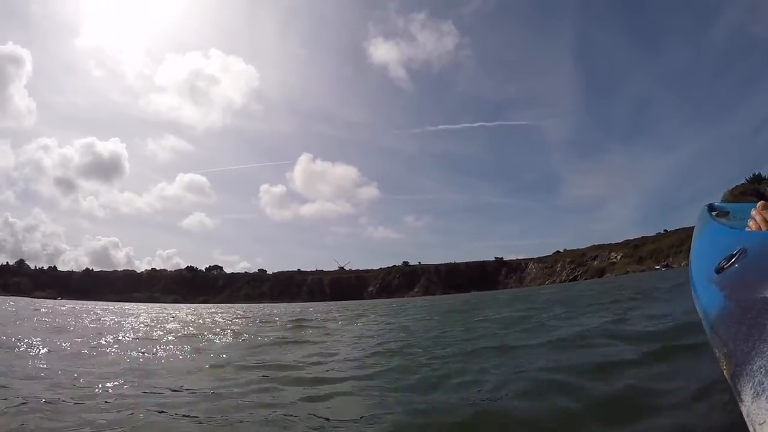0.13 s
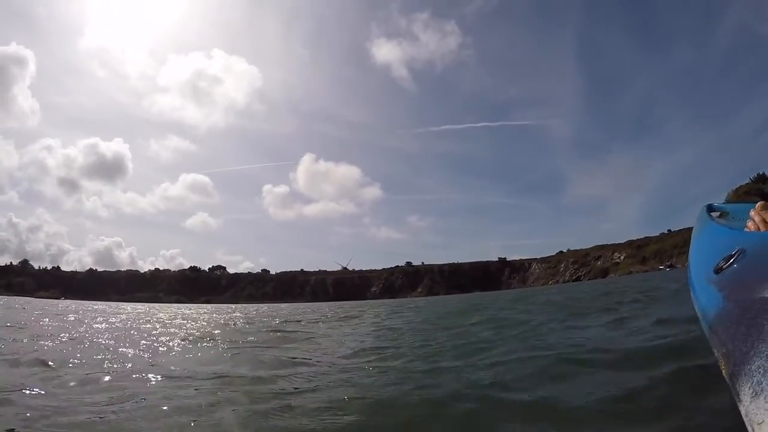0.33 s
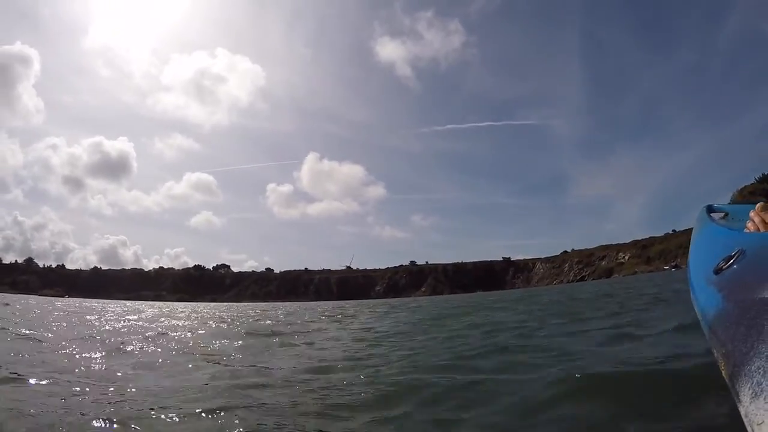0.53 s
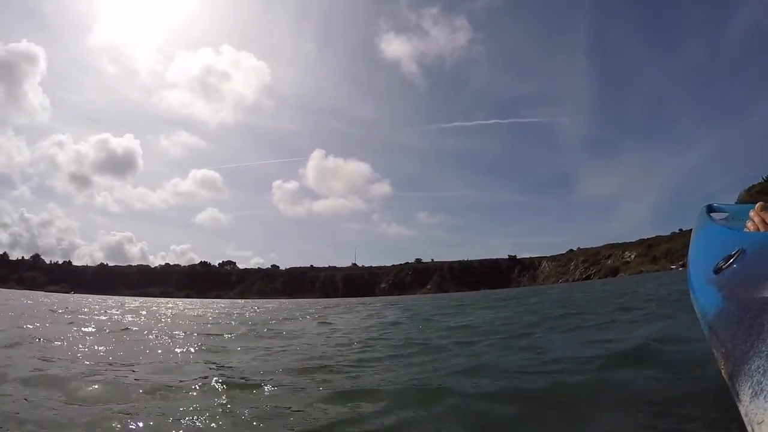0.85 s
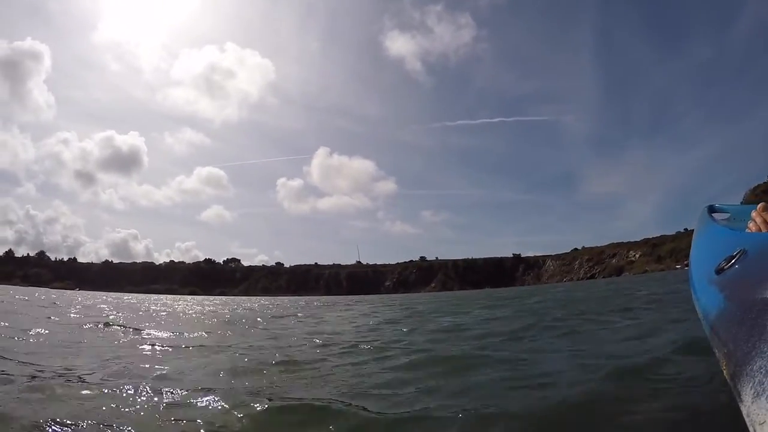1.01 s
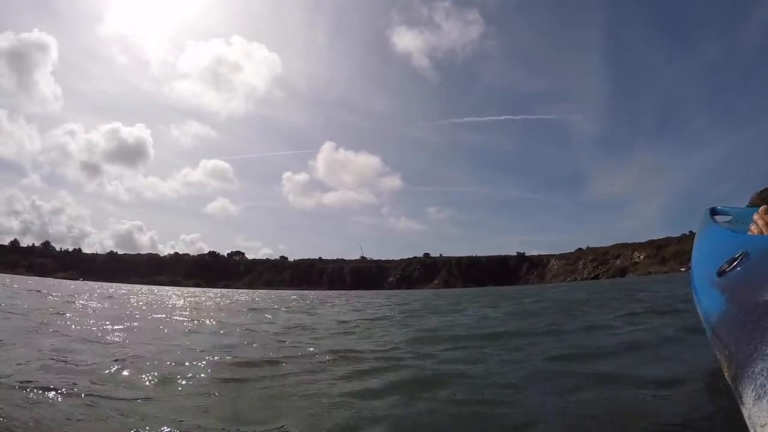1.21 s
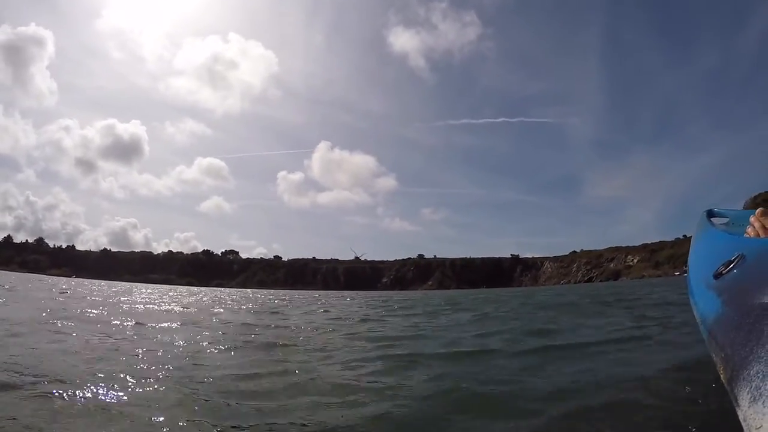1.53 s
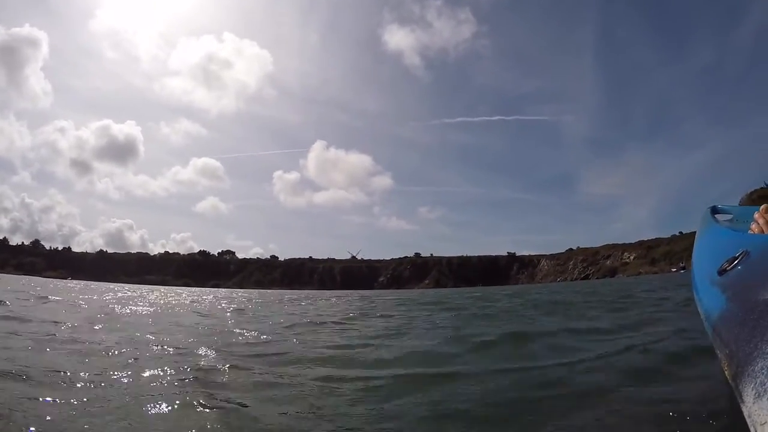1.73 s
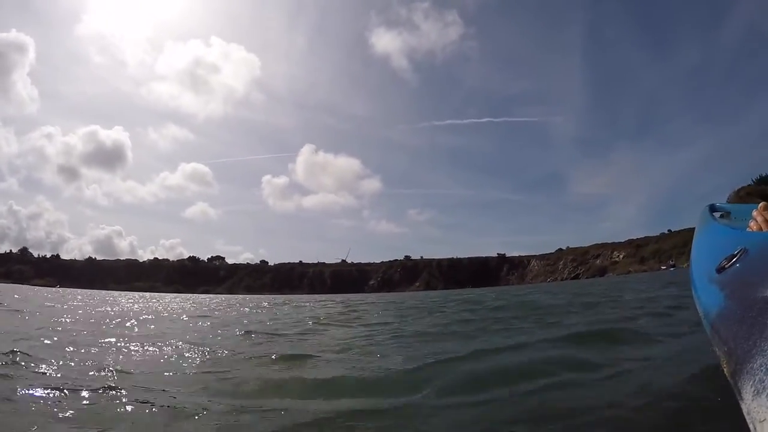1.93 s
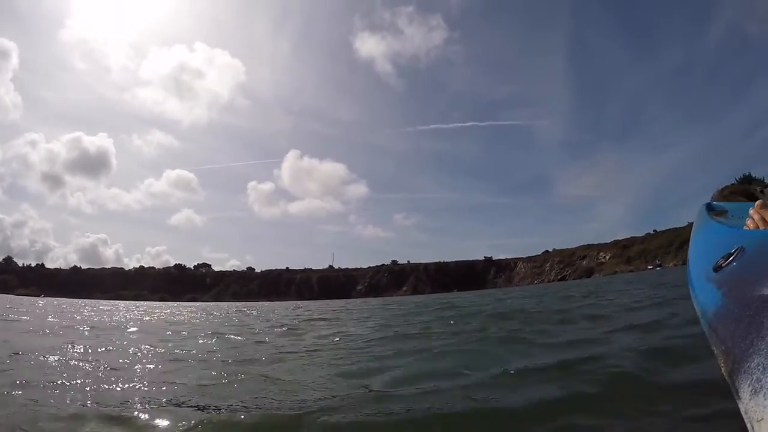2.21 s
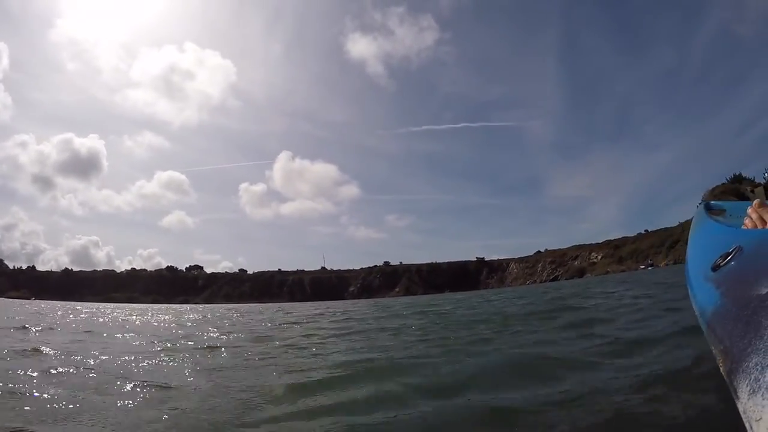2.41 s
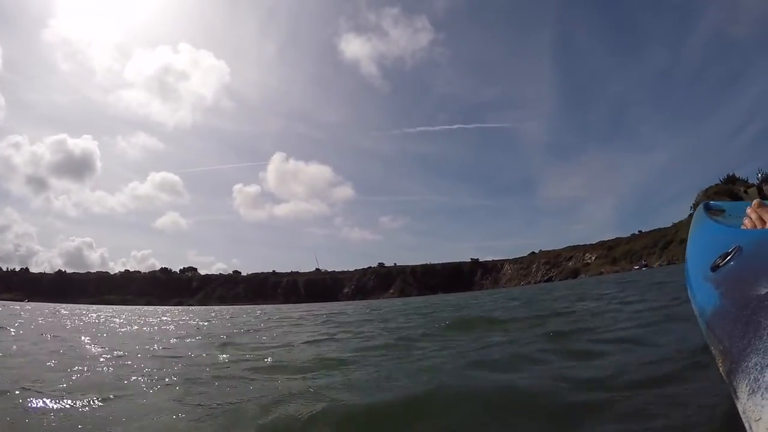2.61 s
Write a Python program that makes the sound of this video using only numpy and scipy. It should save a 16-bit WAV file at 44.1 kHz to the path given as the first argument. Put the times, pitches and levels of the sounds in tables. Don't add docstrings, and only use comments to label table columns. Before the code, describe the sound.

Small waves lap and plop against a plastic kayak hull over low, uneven wind rumble

```python
import sys
import numpy as np
from scipy import signal
from scipy.fft import rfft, irfft
from scipy.io import wavfile
from scipy.ndimage import uniform_filter1d

SR = 44100
rng = np.random.default_rng(int(sys.argv[2]) if len(sys.argv) > 2 else 0)


def level_to_linear(level):
    exponent = np.asarray(level, float) / 20
    return 10 ** exponent


def store_pcm(level_fs):
    pcm = np.round(np.clip(level_fs, -1, 1) * 32767).astype(np.int16)
    wavfile.write(sys.argv[1], SR, np.atleast_2d(pcm).T)


N = 121275
SPACING_S = .0006


def rms_one(x):
    return x / np.sqrt(np.mean(x ** 2) + 1e-20)


def in_time(rows):
    s, *columns = np.transpose(rows)
    return [np.interp(np.arange(N) / SR, s, column) for column in columns]


def at_hz(points, hz):
    point_hz, point_db = np.transpose(points)
    return np.interp(np.log(hz), np.log(point_hz), point_db)


def drift(rate_hz):
    r = np.exp(-2 * np.pi * rate_hz * 40 / SR)
    noise = rng.standard_normal(N // 40 + 2002)
    slow = signal.lfilter([1], [1, -2 * r, r * r], noise)[2000:]
    return np.interp(np.arange(N) / 40, np.arange(len(slow)), rms_one(slow))


def colour(x, spectrum):
    hz = np.maximum(np.fft.rfftfreq(N, 1 / SR), 1)
    gain = level_to_linear(at_hz(spectrum, hz)) * (hz > spectrum[0][0])
    return rms_one(irfft(rfft(x) * gain, N))


def bandpass(x, low_hz, high_hz):
    return signal.sosfilt(signal.butter(2, [low_hz, high_hz], "band", fs=SR, output="sos"), x)


def panned(pan_db):
    return level_to_linear(np.array([[.5], [-.5]]) * pan_db)


def add(out, s, sound, pan_db, side):
    for channel, gain in enumerate(panned(pan_db)[:, 0]):
        late_s = SPACING_S * max(side * (1 - 2 * channel), 0)
        i = int((s + late_s) * SR)
        out[channel, i:i + len(sound)] += gain * sound[:N - i]


def blip(hz, rise, length_s, attack):
    u = np.arange(int(2 * length_s * SR)) / (length_s * SR)
    waver = 1 + .55 * np.sin(2 * np.pi * (rng.uniform(1, 2) * u + rng.random()))
    swell = np.minimum(u / attack, 1) * level_to_linear(-16 * np.maximum(u - attack, 0) ** 2)
    start_hz, end_hz = hz * (1 - rise / 2), hz * (1 + rise / 2)
    pitch_hz = start_hz * (end_hz / start_hz) ** u * (0.983 + 0.018 * waver)
    return np.sin(2 * np.pi * np.cumsum(pitch_hz) / SR) * swell * waver


def grains(rate, spread):
    sizes = level_to_linear(spread * np.minimum(rng.exponential(1, N), 2.6)) * rng.choice([-1, 1], N)
    sizes = sizes * (rng.random(N) < rate / SR)
    at = np.flatnonzero(sizes)
    place = rng.uniform(-1, 1, N)[at]
    out = np.zeros((2, N))
    out[0, at] = sizes[at] * level_to_linear(4 * place)
    at_right = np.clip(at + (place * SPACING_S * SR).astype(int), 0, N - 1)
    np.add.at(out[1], at_right, sizes[at] * level_to_linear(-4 * place))
    return out


def ringing(rate, cycles, low_hz, high_hz, count):
    out = 0
    for hz in np.geomspace(low_hz, high_hz, count):
        r = level_to_linear(-60 * hz / (cycles * np.sqrt(hz / 1000) * SR))
        w = 2 * np.pi * hz / SR
        clicks = grains(rate * hz / 60000, spread=4.0) + 1e-18
        rings = signal.lfilter([0, 1], [1, -2 * r * np.cos(w), r * r], clicks)
        out = out + rms_one(rings) * np.sqrt(hz)
    return out


# time_s, level_db, left_minus_right_db, flutter_db
WIND_GUSTS = [(0, -36.5, 0.5, 0), (0.22, -38.5, 2, 1), (0.36, -33.5, 8, -3), (0.5, -36.5, 18.5, -2.5),
              (0.62, -31.5, -7.5, 2), (0.76, -38, -1, 5), (0.9, -32.5, -9.5, 0.5), (1.2, -34, -1, -1),
              (1.38, -33.5, -5, 1.5), (1.55, -38.5, -18.5, 2.5), (1.75, -48.5, -21, 3),
              (2.05, -34.5, -5.5, 2), (2.22, -33.5, -16, -4), (2.32, -41.5, -5, 1), (2.42, -35, -19, -15),
              (2.6, -43.5, -9.5, 5), (2.74, -40.5, -8, -3.5)]
# freq_hz, density_db (per Hz)
WIND_COLOUR = [(12, -41), (20, 2.5), (45, -1), (90, -15), (151, -28), (500, -49.5), (650, -66),
               (1100, -120)]
FLUTTER_HZ = 69.4


def wind():
    level_db, pan_db, flutter_db = in_time(WIND_GUSTS)
    rumble = colour(rng.standard_normal((2, N)), WIND_COLOUR)
    power = uniform_filter1d(rumble ** 2, SR // 12, axis=1)
    rumble = rms_one(rumble / (power + 0.24) ** 0.028)
    hz = np.fft.rfftfreq(N, 1 / SR)
    thud = irfft(rfft(rumble) / (1 + (hz / FLUTTER_HZ) ** 6), N)
    rumble = thud + (rumble - thud) * level_to_linear(flutter_db)
    return rumble * level_to_linear(level_db + 1.0) * panned(0.87 * pan_db)


# time_s, level_db
WASH_LEVEL = [(0.0, -58), (1.99, -64), (2.75, -60.5)]
# freq_hz, density_db (per Hz)
WASH_COLOUR = [(120, 1.5), (200, 0.5), (601, -9.5), (1300, -9), (2090, -14), (8740, -23), (16000, -31)]
FIZZ_PER_S, FIZZ_CYCLES, FIZZ_DB = 2500, 6.1, -4
GURGLE_PER_S, GURGLE_CYCLES, GURGLE_DB = 1200, 22, -2


def wash():
    level_db, = in_time(WASH_LEVEL)
    hiss, together = 0, drift(12)
    white = rng.standard_normal((2, 2, N))
    edges = 200 * 2 ** np.arange(0, 6.6, .5)
    for k, (low_hz, high_hz) in enumerate(zip(edges, edges[1:])):
        band = bandpass(white[k % 2], low_hz, high_hz)
        hiss = hiss + band * level_to_linear(1.2 * together + 1.5 * drift(15))
    fizz = ringing(FIZZ_PER_S * level_to_linear(2.2 * together), FIZZ_CYCLES, 300, 14000, count=20)
    gurgle = ringing(GURGLE_PER_S * level_to_linear(4 * drift(5)), GURGLE_CYCLES, 400, 2200, count=14)
    fade_in = np.minimum(np.arange(N) / (0.047 * SR), 1)
    water = colour(hiss, WASH_COLOUR) + level_to_linear(FIZZ_DB) * colour(fizz, WASH_COLOUR)
    water = water + level_to_linear(GURGLE_DB) * colour(gurgle, WASH_COLOUR) * fade_in
    return water * level_to_linear(level_db - 0.5)


ABEAM_PLOPS = [0.0, 0.144, 0.434, 0.448, 0.495, 0.575, 0.599, 0.78, 0.937, 1.482, 1.59, 2.554]
NEAR_SIDE = .3


def bearing(s, hz):
    near = NEAR_SIDE * rng.uniform(-1, 1) * min(1000 / hz, 1)
    abeam = min(.42 / (hz * SPACING_S), 1)
    return abeam if s in ABEAM_PLOPS else near


# start_s, pitch_hz, peak_db, length_s, left_minus_right_db
AIR_POCKETS = [(0.0, 740, -45, 0.036, 8), (0.144, 690, -45, 0.012, 1), (0.19, 385, -50, .02, -2),
               (0.208, 1050, -51, .012, 0), (0.265, 1100, -52, .006, -2), (0.368, 1130, -46, 0.008, -1),
               (0.486, 1100, -45, .008, -3), (0.495, 680, -41, 0.012, -4), (0.548, 1290, -50, .01, -3),
               (0.55, 430, -52, .012, -3), (0.574, 830, -48, 0.024, -2), (0.641, 890, -51, .008, 0),
               (0.78, 590, -49, .01, -2), (0.781, 1110, -49, 0.008, -1), (0.805, 900, -51, 0.018, -3),
               (0.937, 860, -48, 0.02, -5), (0.966, 860, -43, 0.012, 3), (1.071, 530, -52, 0.02, -5),
               (1.146, 830, -50, 0.024, -2), (1.286, 1200, -47, 0.008, -9), (1.299, 400, -48, .016, -5),
               (1.388, 950, -47, 0.008, -1), (1.482, 760, -48, .008, 0), (1.544, 860, -47, 0.01, -2),
               (1.59, 740, -46, 0.02, 4), (1.743, 1170, -52, 0.009, -3), (1.813, 980, -53, .008, 1),
               (1.891, 420, -52, 0.018, 2), (1.914, 1030, -52, .008, -2), (2.31, 1000, -53, .012, 0),
               (2.492, 810, -46, 0.012, 2), (2.5, 500, -51, .01, 0), (2.537, 1100, -49, 0.007, 0),
               (2.596, 1130, -54, .008, 0), (2.554, 1150, -49, .007, 0)]


def bubbles():
    out = np.zeros((2, N))
    for s, hz, db, length_s, pan_db in AIR_POCKETS:
        plop = blip(hz, rise=.07, length_s=length_s, attack=.18)
        add(out, s, level_to_linear(db - 3) * plop, pan_db, bearing(s, hz))
    return out


# start_s, pitch_hz, peak_db, left_minus_right_db
FALLING_DROPS = [(0.071, 2330, -56, 0), (0.116, 2400, -55, -8), (0.167, 2850, -53, -8),
                 (0.178, 1950, -54, -1), (0.402, 3050, -49, -5), (0.434, 1900, -41, -6),
                 (0.435, 1600, -43, -3), (0.448, 2350, -43, -9), (0.449, 1550, -49, -4),
                 (0.465, 2450, -50, -8), (0.486, 2500, -53, -6), (0.496, 1400, -48, -3),
                 (0.552, 2900, -54, -5), (0.575, 1850, -49, -6), (0.599, 1930, -48, -3),
                 (0.611, 2510, -51, -8), (0.629, 2450, -47, -9), (0.792, 1400, -53, 5),
                 (0.826, 3200, -44, -8), (0.864, 1300, -50, -5), (0.898, 1350, -52, 5),
                 (0.953, 2590, -55, 1), (1.174, 2400, -55, -3), (1.519, 1600, -51, -1),
                 (1.679, 1900, -55, 0), (1.758, 2370, -55, -1), (1.934, 1500, -44, -4),
                 (1.936, 2900, -55, -2), (2.371, 3030, -49, -7), (2.49, 2350, -55, -1),
                 (2.523, 2420, -54, 1), (2.667, 1700, -56, 0)]
DROP_CYCLES = 10


def drops():
    out = np.zeros((2, N))
    for s, hz, db, pan_db in FALLING_DROPS:
        side = bearing(s, hz)
        mate_hz = hz * rng.choice([.84, 1.12, 1.25])
        plink = blip(hz, rise=.04, length_s=DROP_CYCLES / hz, attack=.25)
        mate = blip(mate_hz, rise=0, length_s=DROP_CYCLES / hz, attack=.25)
        add(out, s, level_to_linear(db - 2) * plink, pan_db, side)
        add(out, s, level_to_linear(db - 10) * mate, pan_db, side)
    return out


# break_s (start of the held top), hold_s, fall_s, level_db, tail_db
GULL_CRIES = [
    (.232, .008, .03, -54, -2),
    (.562, .014, .02, -54, 0),
    (.885, .012, .035, -53, 0),
    (1.217, .014, .028, -53, 0),
    (1.525, .012, .062, -55, -2),
    (1.865, .06, .055, -57, 0),
    (2.315, .065, .1, -59, -6),
]
# freq_hz, level_db
GULL_THROAT = [(1150, -1), (1350, 0), (2700, -24), (3500, -12), (3900, -30)]
LEAD_S, BREAK_S, AFTER_S = .085, .016, .05
LEAD_HZ, TOP_HZ, DROP_HZ, END_HZ = 1260, 1490, 1215, 1140
LEAD_DB = -2


def gull():
    out = np.zeros((2, N))
    for s, hold, fall, db, tail_db in GULL_CRIES:
        knots = np.cumsum([0, LEAD_S - BREAK_S, BREAK_S, hold, fall, AFTER_S])
        t = np.arange(int(knots[-1] * SR)) / SR
        hz = np.interp(t, knots, [LEAD_HZ, LEAD_HZ, TOP_HZ, TOP_HZ, DROP_HZ, END_HZ])
        knots_db = [LEAD_DB - 300 * hold, LEAD_DB - 60 * hold, -1, 0, tail_db / 2, tail_db]
        level = level_to_linear(np.interp(t, knots, knots_db) + 3 * drift(50)[:len(t)])
        level = level * np.minimum(np.minimum(t, knots[-1] - t) / 0.0067, 1)
        phase = 2 * np.pi * np.cumsum(hz) / SR
        cry = sum(level_to_linear(at_hz(GULL_THROAT, k * hz)) * np.sin(k * phase) for k in range(1, 4))
        add(out, s - LEAD_S, level_to_linear(db - 4) * level * cry, pan_db=-3, side=1.88)
    return out


# start_s, length_s, level_db
BREAKING_CRESTS = [(0.279, 0.061, -54.5), (0.398, 0.0062, -52.5), (0.426, 0.031, -52), (0.43, 0.045, -50),
                   (0.475, 0.06, -54.5), (0.788, 0.06, -69.5), (0.923, 0.04, -62), (1.446, 0.09, -61),
                   (1.511, 0.27, -63.5), (1.756, 0.12, -66.5), (1.91, 0.089, -63), (2.157, 0.044, -68),
                   (2.47, 0.11, -58.5)]
# freq_hz, density_db (per Hz)
SPLASH_COLOUR = [(240, -30), (400, -9.5), (777, 0.5), (1530, -2), (16000, -20)]
SPLASH_PER_S = 4000
BRIGHT_UNDER_S, BRIGHT_HZ = .035, 2590


def splashes():
    t = np.arange(N) / SR
    body_gain, thin_gain = np.zeros((2, 2, N))
    for s, length, db in BREAKING_CRESTS:
        u = np.clip((t - s) / length, 0, 1.5)
        swell = np.minimum(u / 0.15, 1) * np.cos(u * np.pi / 3) ** 2
        gain = thin_gain if length < BRIGHT_UNDER_S else body_gain
        gain += level_to_linear(db) * panned(-4) * swell
    foam = rms_one(ringing(SPLASH_PER_S, 9, 400, 13000, count=20))
    crackle = rms_one(grains(SPLASH_PER_S, spread=3))
    crowd = colour(foam + .5 * crackle, SPLASH_COLOUR)
    highpass = signal.butter(2, BRIGHT_HZ, "high", fs=SR, output="sos")
    thin = rms_one(signal.sosfilt(highpass, crowd))
    return level_to_linear(3.7 * drift(27)) * (body_gain * crowd + thin_gain * thin)


# start_s, centre_hz, peak_db
SPRAY_TICKS = [(0.402, 11500, -45), (0.289, 7510, -48), (0.29, 4300, -55), (0.781, 5900, -59),
               (0.93, 4290, -57), (0.992, 3900, -59), (1.138, 4400, -55), (1.267, 10230, -50),
               (1.468, 9290, -52), (1.48, 13430, -61), (1.496, 5950, -60), (1.659, 8200, -60),
               (1.702, 6400, -57), (1.703, 12500, -61), (1.776, 12500, -61), (1.802, 6620, -58),
               (1.815, 8500, -59), (1.881, 6000, -60), (1.882, 12000, -63), (1.945, 5000, -58),
               (2.163, 7500, -58), (2.279, 5800, -50), (2.307, 12150, -62), (2.466, 9500, -51),
               (2.467, 13500, -55), (2.545, 10500, -60), (2.62, 12500, -57), (2.656, 8700, -53)]
TICK_S, TICK_WIDTH, SKIRT_DB = .003, .3, -4


def spray():
    out = np.zeros((2, N))
    for s, hz, db in SPRAY_TICKS:
        u, noise = np.arange(600) / (TICK_S * SR), rng.standard_normal(600)
        core = bandpass(noise, hz * (1 - TICK_WIDTH / 2), hz * (1 + TICK_WIDTH / 2))
        skirt = bandpass(noise, hz * .45, min(hz * 1.7, .45 * SR))
        tick = rms_one(core) + level_to_linear(SKIRT_DB) * rms_one(skirt)
        tick = tick * np.minimum(u / .2, 1) * level_to_linear(-9 * u ** 1.5)
        add(out, s, level_to_linear(db - 2) * tick, pan_db=-3, side=.4 * rng.uniform(-1, 1))
    return out


# start_s, length_s, start_hz, end_hz, peak_db
FILLING_CAVITIES = [
    (0.468, 0.034, 315, 560, -50),
    (1.552, .022, 900, 1250, -57),
    (1.608, .03, 800, 1280, -57),
    (2.225, .077, 190, 680, -51),
]


def glugs():
    out = np.zeros((2, N))
    for s, length, hz, end_hz, db in FILLING_CAVITIES:
        u = np.linspace(0, 1, int(length * SR))
        climb = np.sin(2 * np.pi * np.cumsum(hz * (end_hz / hz) ** u) / SR)
        swell = np.sin(np.pi * u) ** .5 * level_to_linear(3.5 * drift(70)[:len(u)])
        add(out, s, level_to_linear(db) * climb * swell, pan_db=2.5, side=-.8)
    return out


def scene():
    water = None
    background = wind() + wash()
    hull = splashes() + bubbles() + drops() + glugs() + spray()
    return background + hull + gull()


def band_limit(x):
    return signal.sosfilt(signal.butter(12, 16660, fs=SR, output="sos"), x)


def record(dry):
    lowpass = signal.cheby2(16, 50, 16150, fs=SR, output="sos")
    return band_limit(signal.sosfilt(lowpass, dry))


dry = scene()
out = record(dry)
store_pcm(out)
```